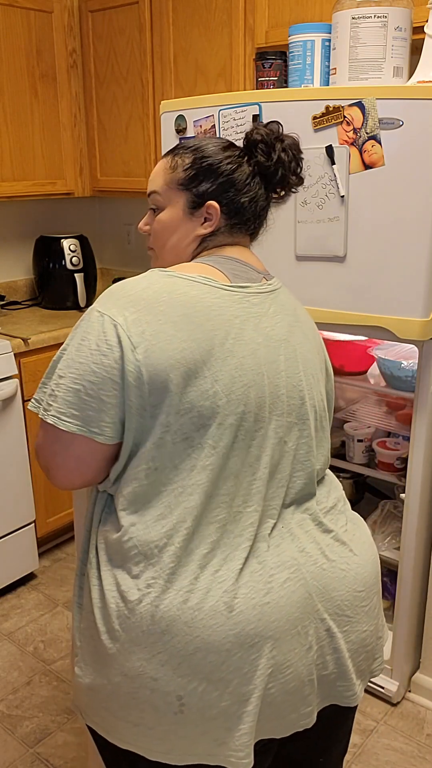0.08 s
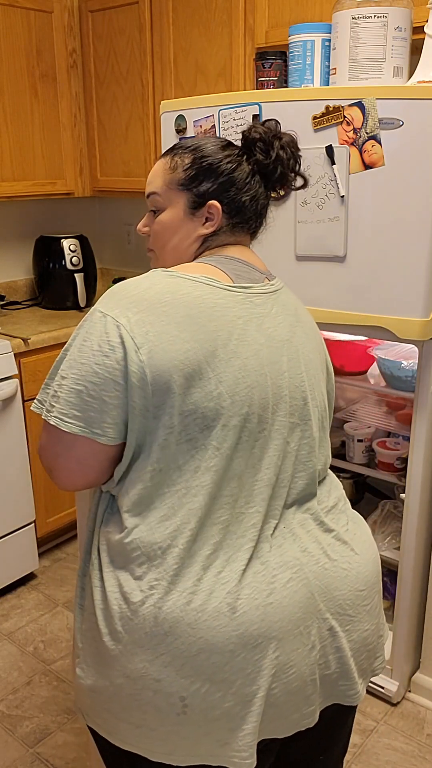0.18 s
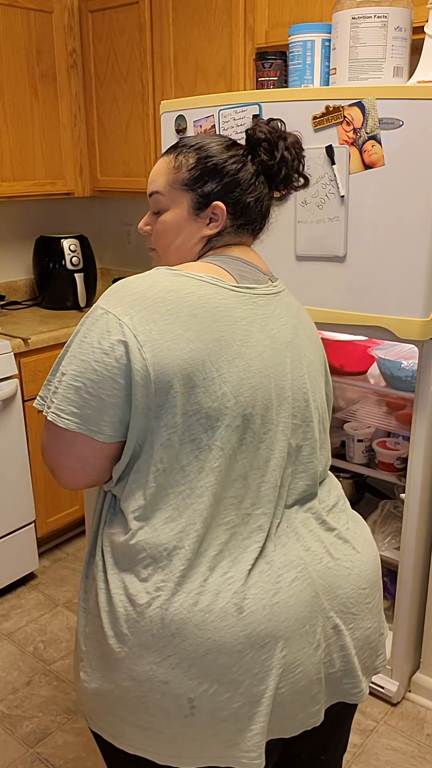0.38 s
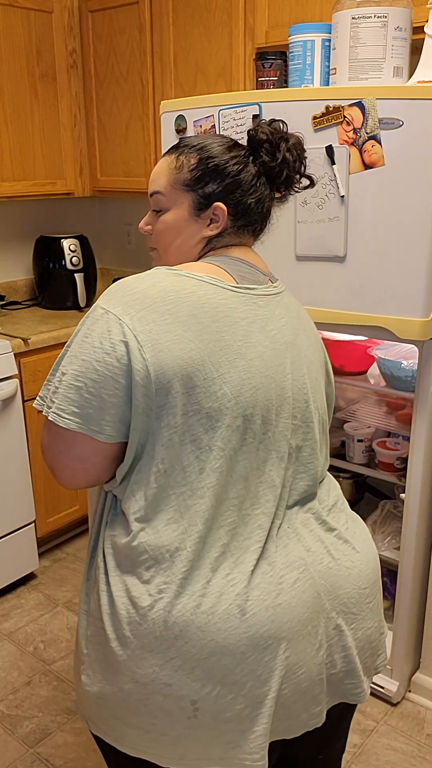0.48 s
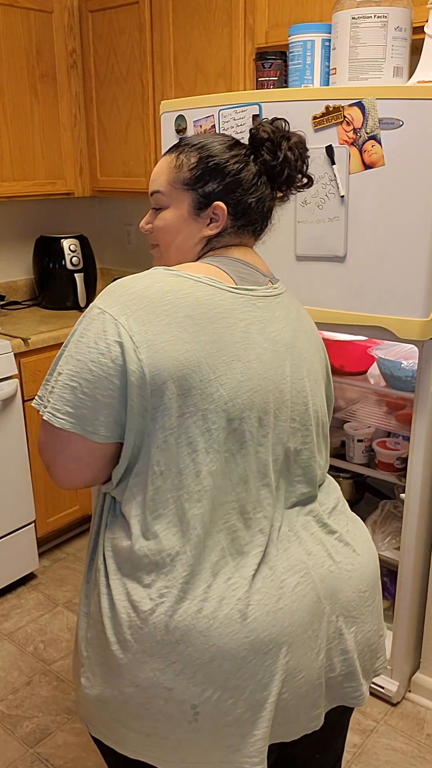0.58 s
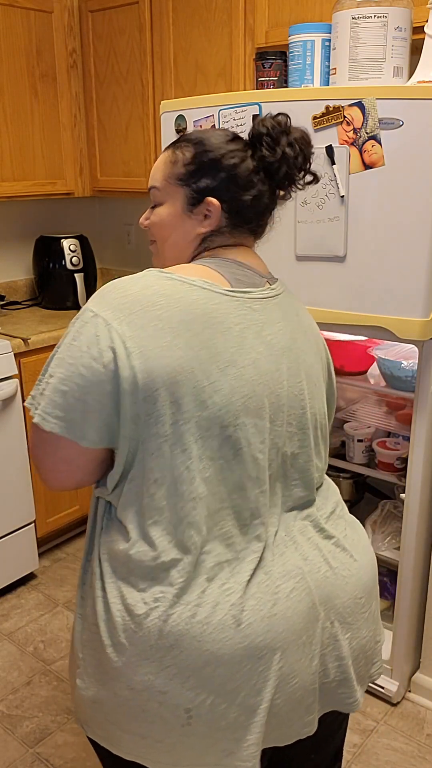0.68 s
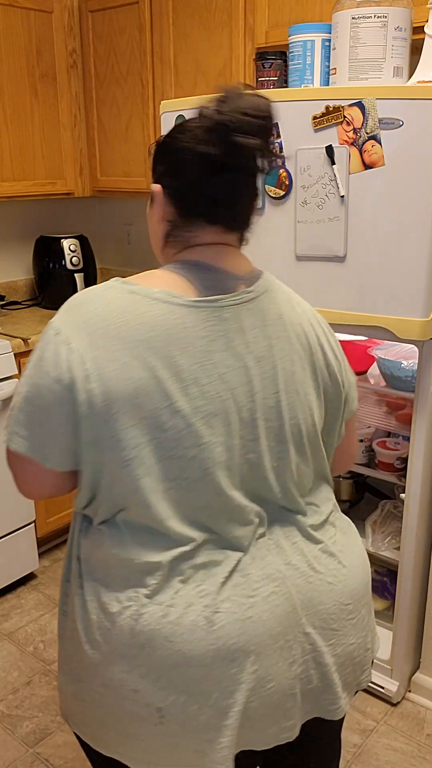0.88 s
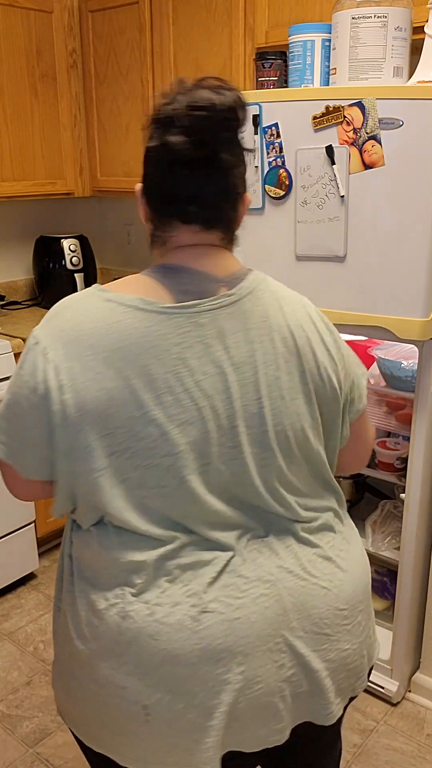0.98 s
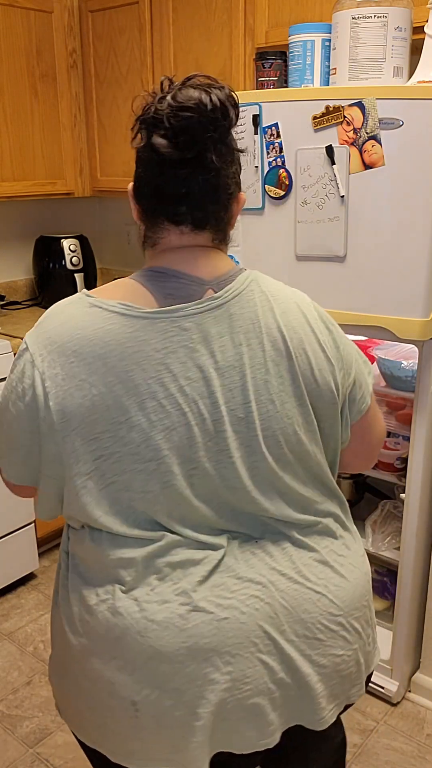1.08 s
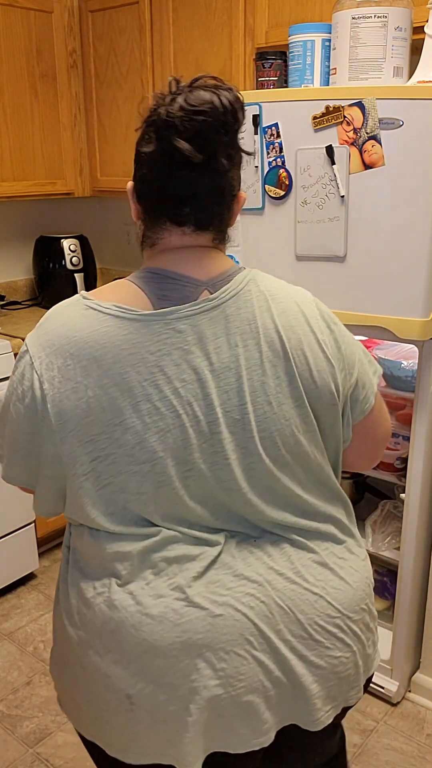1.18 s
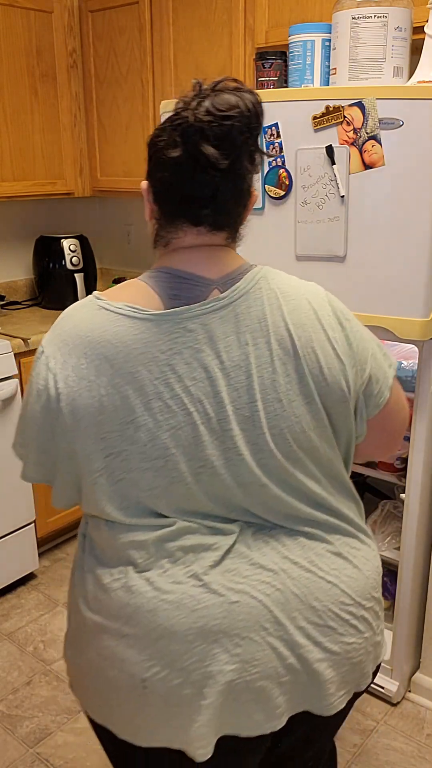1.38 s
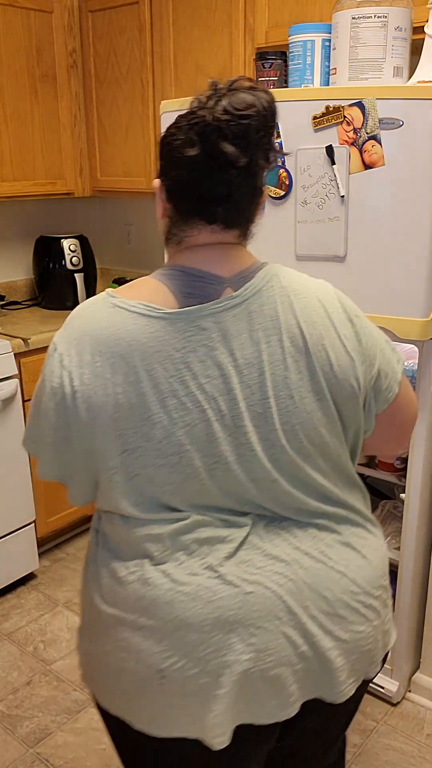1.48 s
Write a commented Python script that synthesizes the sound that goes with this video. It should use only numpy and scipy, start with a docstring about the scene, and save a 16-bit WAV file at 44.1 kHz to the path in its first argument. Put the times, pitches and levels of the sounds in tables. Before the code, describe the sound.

In a small, echoing kitchen, something heavy lands on a fridge shelf with booming bumps, preceded by hollow plastic clacks. Two jars clink, and quieter knocks, faint ticks and a short slide of packaging follow over a low hum.

```python
"""A heavy load bumps and judders onto a shelf of an open refrigerator in a small, hard-walled kitchen.
The bumps make the cabinet boom, and two jolted glass jars clink.
Just before that come the dull tail of a knock and the hollow clacks of plastic containers being put away.
Softer knocks, two light ticks and a brief slide of packaging follow, all over a low mains hum."""
import sys
import numpy as np
from scipy import signal
from scipy.fft import rfft, irfft, next_fast_len
from scipy.io import wavfile

SR = 44100
rng = np.random.default_rng(int(sys.argv[2]) if len(sys.argv) > 2 else 0)


def log_audio(samples):
    """Write samples as a 16-bit WAV file to the path given in sys.argv[1]."""
    # one column per channel
    frames = np.atleast_2d(samples).T
    # limit to full scale, then quantise
    limited = np.clip(frames, -1, 1)
    pcm = np.round(limited * 32767).astype(np.int16)
    wavfile.write(sys.argv[1], SR, pcm)


N = 68355
T = np.arange(N) / SR
FFT_SIZE = next_fast_len(2 * N)
HZ = np.fft.rfftfreq(FFT_SIZE, 1 / SR)


def amp(db):
    """Turn decibels into a number to multiply by."""
    return 10 ** (np.asarray(db) / 20)


def unit(x):
    """Scale to an average (rms) size of 1."""
    return x / np.sqrt(np.mean(x ** 2) + 1e-20)


def along(points, hz):
    """Read a curve drawn through (pitch_hz, value) points on a scale of octaves."""
    pitches, values = np.transpose(points)
    return np.interp(np.log(hz + 1), np.log(pitches + 1), values)


def filtered(x, response):
    """Turn each frequency in x up or down by the given response."""
    return irfft(rfft(x, FFT_SIZE) * response, FFT_SIZE)[..., :N]


def causal(gain):
    """Make a filter with this gain that never sounds before its cause."""
    cepstrum = irfft(np.log(np.maximum(gain, 1e-6)), FFT_SIZE)
    cepstrum[1:FFT_SIZE // 2] *= 2
    cepstrum[FFT_SIZE // 2 + 1:] = 0  # this half stands for time before the cause
    return np.exp(rfft(cepstrum))


def fade(fade_s, age_s=T):
    """Die away by 60 dB every fade_s seconds."""
    return np.exp(-np.log(1000) * age_s / fade_s)


def add(out, start_s, sound):
    """Mix a sound in from start_s on."""
    start = max(0, round(start_s * SR))
    out[:, start:] += sound[:, :N - start]


def stereo_noise():
    """White noise whose left and right are alike in the bass and unrelated in the treble."""
    # how alike the two sides are: pitch_hz, likeness (1 = the same)
    alike = [(60, 1), (130, 1), (260, 0.73), (500, 0.87), (1000, -0.14), (3000, -0.069), (15000, 0)]
    angle = np.arccos(np.clip(along(alike, HZ), -1, 1)) / 2
    mid, side = filtered(rng.standard_normal((2, N)), np.array([np.cos(angle), np.sin(angle)]))
    return np.array([mid + side, mid - side])


def kitchen_echo():
    """Sound bounces between the hard walls, each pitch dying at its own speed."""
    # how long the kitchen rings: pitch_hz, fade_s
    echo_times = [(60, 1), (200, 0.68), (500, 0.74), (1200, 0.7), (3000, 0.65), (7000, 0.55), (15000, 0.43)]
    hz, age_s, spectrum = signal.stft(stereo_noise(), SR, nperseg=256)
    spectrum *= fade(along(echo_times, hz)[:, None], age_s)
    return signal.istft(spectrum, SR, nperseg=256)[1][:, :N]


def contact(colour, brightness, rise_s, fade_s, crack_db, room_db, roughness):
    """One blow: a sharp crack, a short noisy chatter and the room's echo, in the object's tone colour."""
    jitter = rng.standard_normal(2000)
    chatter = unit(np.exp(roughness * np.interp(T, np.linspace(0, T[-1], len(jitter)), jitter)))
    crack = amp(crack_db) * stereo_noise() * fade(0.013)
    ring = stereo_noise() * chatter * fade(fade_s) + amp(room_db) * kitchen_echo()
    octaves = np.log2(np.maximum(HZ, 300) / 1000)
    gain = amp(along(colour, HZ) + brightness * octaves)
    return filtered(crack + ring * (1 - np.exp(-T / rise_s)), causal(unit(gain)))


def ringing(tones, blows, spread, rise_s, waver):
    """An object's tones gain energy at each blow and die away; loose contact makes them waver."""
    out = np.zeros((2, N))
    hits = [(np.maximum(T - start_s, 0), amp(db)) for start_s, db, *_ in blows]
    for hz, db, fade_s in tones:
        energy = sum((size * (1 - np.exp(-age / rise_s)) * fade(fade_s, age)) ** 2 for age, size in hits)
        wander = waver * np.cumsum(rng.standard_normal(N)) / np.sqrt(SR)
        ear_shift = spread * rng.choice([-1, 1]) * np.array([[1], [-1]])
        phase = 2 * np.pi * (hz * T + rng.random()) + wander + ear_shift
        out += amp(db) * np.sqrt(energy) * np.sin(phase)
    return out


def hum_and_air():
    """Mains electricity hums steadily over the dull air of the room."""
    # tones of the hum: pitch_hz, level_db
    hum_tones = [(59.2, -56.5), (118.4, -67.5)]
    # tone colour of the air: pitch_hz, level_db
    air_colour = [(20, -21.5), (60, 5), (180, 3.5), (400, -4.5), (700, -8.5), (1500, -25), (3000, -41),
                  (6000, -36.5), (8000, -29), (11000, -38.5), (15500, -41)]
    hum = sum(amp(db) * np.sqrt(2) * np.sin(2 * np.pi * (hz * T + rng.random())) for hz, db in hum_tones)
    air = unit(filtered(stereo_noise(), amp(along(air_colour, HZ))))
    return hum + amp(-57.5) * air


def knock_tail():
    """The dull tail of a knock dies away in the room's echo."""
    # tone colour of the fading knock: pitch_hz, level_db
    colour = [(30, -22.5), (90, -1.5), (200, 0), (700, -2), (1200, -12.5), (3000, -14.5), (5500, -16),
              (8000, -16.5), (10500, -31), (15500, -28)]
    hold_s = 0.0247
    level = amp(-42) * fade(0.24, np.maximum(T - hold_s, 0))
    gain = amp(along(colour, HZ))
    tail = level * unit(filtered(stereo_noise(), gain))
    return tail + amp(-40.5) * filtered(kitchen_echo(), unit(gain))


def containers():
    """Hard plastic tubs clack against the shelf and ring hollowly."""
    # tubs touching the shelf: start_s, level_db, brightness_db_per_octave, rise_s
    clacks = [(.0615, -31.5, 1.5, 0.0035), (0.218, -19.5, -0.17, 0.0015), (.227, -23.5, 1.8, .002),
              (.292, -19.5, 0.2, 0.0018)]
    # tone colour of a clack: pitch_hz, level_db
    colour = [(30, -29.5), (130, -12), (250, -14.5), (340, -4.5), (440, 1.5), (550, -6.5), (690, 2.5),
              (950, -2.5), (1500, -1.5), (3200, -6), (5500, -11), (8000, -16.5), (11000, -25.5),
              (15500, -17)]
    # ring of a hollow tub: pitch_hz, level_db, fade_s
    tub_tones = [(367, -4.5, 0.083), (444.2, -1, 0.43), (657.4, -1.5, 0.6), (813.5, -5, 0.21),
                 (1320, -4, 0.28), (1600, -7, .2), (3220, -8.5, 0.53), (3604, -8.5, 0.45)]
    out = amp(-14) * ringing(tub_tones, clacks, spread=0.7, rise_s=0.0029, waver=9.9)
    for start_s, db, brightness, rise_s in clacks:
        clack = contact(colour, brightness, rise_s, fade_s=0.16, crack_db=-1.5, room_db=-5, roughness=0.25)
        add(out, start_s, amp(db) * clack)
    return out


def heavy_load():
    """The load judders into place: each bump rings the cabinet, and the weight flexes its walls."""
    # bumps on the shelf: start_s, level_db, brightness_db_per_octave, rise_s
    bumps = [(.299, -21.5, -3, 0.0031), (.310, -12, 0.94, 0.0019), (0.33, -19, -1.5, 0.001),
             (.346, -17, -1.6, 0.0011), (.371, -23, -1, 0.0012), (.390, -53, -6, 0.0051),
             (.416, -24, -2.5, 0.0013), (.438, -25.5, -0.1, 0.0017), (0.488, -43, 1, 0.00085),
             (.555, -40.5, 1, 0.0033), (.602, -29, -1.75, .004), (.622, -37.5, -7, .003),
             (.641, -31.5, -5, 0.0013), (0.698, -45.5, -0.5, 0.0023), (0.754, -41.5, -2, 0.0046),
             (.99, -52.5, -7, 0.0069)]
    # tone colour of a bump: pitch_hz, level_db
    colour = [(25, -34.5), (55, -12.5), (95, -12.5), (140, -2.5), (210, -3), (280, -1.5), (350, -3),
              (425, 1), (490, -3.5), (600, -1.5), (715, 3), (820, -4), (1050, -0.5), (1400, -5.5),
              (2000, -8.5), (4000, -15.5), (8000, -20.5), (11000, -30), (15500, -28.5)]
    # ring of the cabinet and its shelves: pitch_hz, level_db, fade_s
    cabinet_tones = [(138, -4, .22), (207, -1, .47), (320, -6, .66), (368, -6, .52), (412, 3, .53),
                     (448, -1, .48), (518, -9, .55), (596, -10, .45), (667, -1, .27), (713, 2, .4),
                     (886, -5, .42), (978, -3, .33), (1087, -5, .48), (1150, -8, .5)]
    # low pushes as the weight lands: start_s, level_db
    thumps = [(0.296, -20), (0.327, -27), (0.485, -37), (0.673, -36)]
    # boom of the refrigerator's walls: pitch_hz, level_db, fade_s
    wall_tones = [(48.9, -13.5, .3), (75.7, -12, 0.17), (127.9, 1, 0.2), (152, -2, 0.16), (185, -5.5, .13)]
    out = amp(-9) * ringing(cabinet_tones, bumps, spread=0.55, rise_s=0.004, waver=3.5)
    out += ringing(wall_tones, thumps, spread=0.29, rise_s=0.0033, waver=8)
    for start_s, db, brightness, rise_s in bumps:
        bump = contact(colour, brightness, rise_s, fade_s=0.19, crack_db=4.5, room_db=-2, roughness=0.32)
        add(out, start_s, amp(db) * bump)
    return out


def jars():
    """Two jolted glass jars clink: the small one short and high, the large one ringing on."""
    # ring of each jar: pitch_hz, level_db, fade_s
    small_jar = [(2641, -7, .35), (3926, -6, .28), (6620, 0, .11), (9142, -6, .11), (10450, -16, .1)]
    large_jar = [(3381, -10, .5), (4038, 0, .42), (6610, -9, .42), (7305, -14, .35), (8000, 0, .05)]
    small_jolt, large_jolt = (0.2985, -18.5), (0.351, -29.5)  # start_s, level_db
    small_clink = ringing(small_jar, [small_jolt], spread=0.6, rise_s=0.0011, waver=7)
    large_clink = ringing(large_jar, [large_jolt], spread=0.2, rise_s=0.00294, waver=6.6)
    return small_clink + large_clink


def packaging():
    """Thin packaging ticks, ringing a plastic lid, and hisses as it slides along the shelf."""
    # light taps: start_s, level_db, brightness_db_per_octave, rise_s
    ticks = [(.982, -53, 1.5, 0.0015), (1.1051, -48.5, -2, .001), (1.108, -52, -1.5, 0.0016)]
    # ring of the thin lid: pitch_hz, level_db, fade_s
    lid_tones = [(2210, -4.5, 0.25), (3200, -17, 0.18), (4400, 4, 0.054), (5350, 2, 0.096),
                 (8000, -3, 0.087), (8440, 3, 0.098)]
    # sliding strokes: middle_s, half_length_s, level_db
    slides = [(0.96, 0.024, -67), (1.251, 0.074, -59.5), (1.504, .04, -87)]
    # tone colours of a tick and of a slide: pitch_hz, level_db
    colour = [(30, -32), (200, 1), (900, 2.5), (2000, -3.5), (4200, 1), (5800, -1), (7800, 5), (10500, -3),
              (15500, -7.5)]
    slide_colour = [(200, -2), (1000, -3.5), (2200, -6.5), (4500, -3), (6500, -6), (7500, -6), (8100, 0),
                    (9000, -9.5), (11000, -11), (15500, -9)]
    out = amp(-10) * ringing(lid_tones, ticks, spread=0.7, rise_s=0.001, waver=17.16)
    for start_s, db, brightness, rise_s in ticks:
        tick = contact(colour, brightness, rise_s, fade_s=0.064, crack_db=6, room_db=-3, roughness=0.35)
        add(out, start_s, amp(db) * tick)
    swell = sum(amp(db) * np.exp(-((T - middle_s) / half_s) ** 2 / 2) for middle_s, half_s, db in slides)
    hiss = unit(filtered(stereo_noise(), amp(along(slide_colour, HZ))))
    return out + swell * hiss


def scene():
    """Mix all the sounds; the treble leans toward the refrigerator on the right."""
    # balance between the ears: pitch_hz, left_minus_right_db
    lean = [(200, 0.5), (1200, 1.1), (4000, 0), (8000, -3), (15000, -1.5)]
    sound = knock_tail() + containers() + heavy_load() + jars() + packaging() + hum_and_air()
    return filtered(sound, amp(along(lean, HZ) * np.array([[0.5], [-0.5]])))


def record(dry):
    """Cut off the very highest treble steeply."""
    top_hz = 15850
    return filtered(dry, causal(1 / np.sqrt(1 + (HZ / top_hz) ** 240)))


dry = scene()
out = record(dry)
log_audio(out)
```